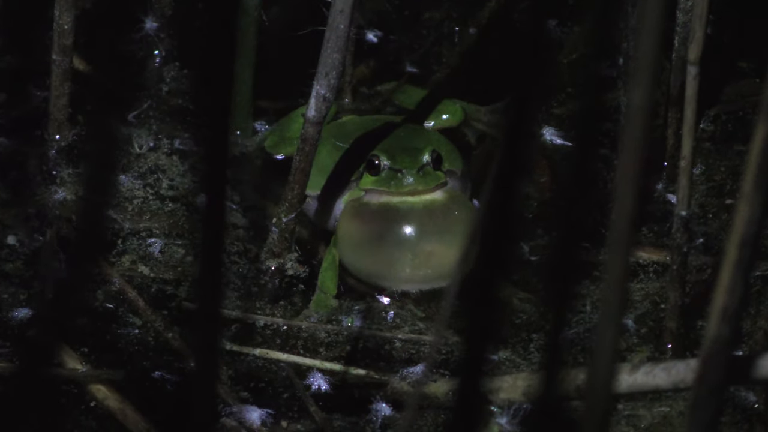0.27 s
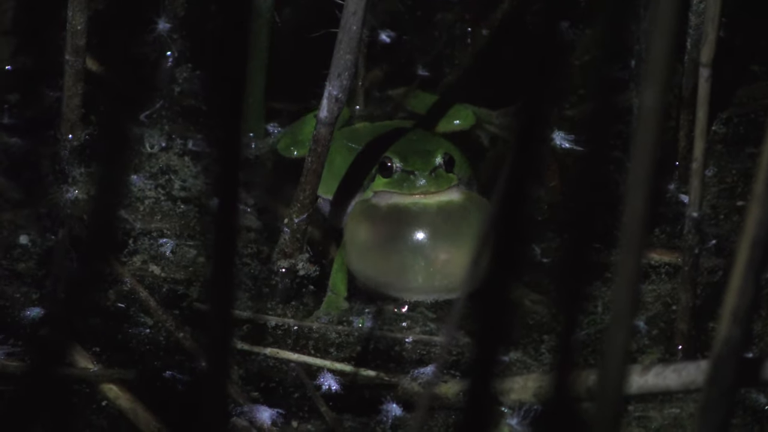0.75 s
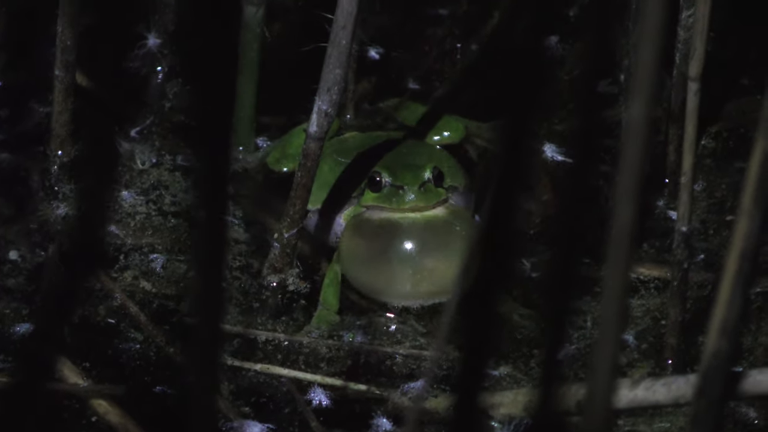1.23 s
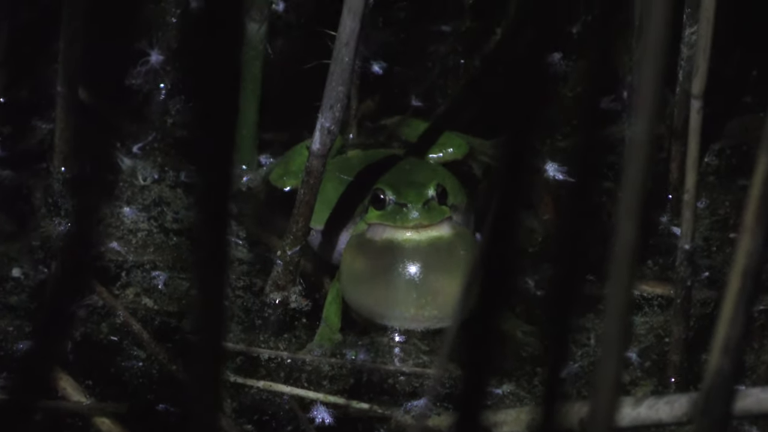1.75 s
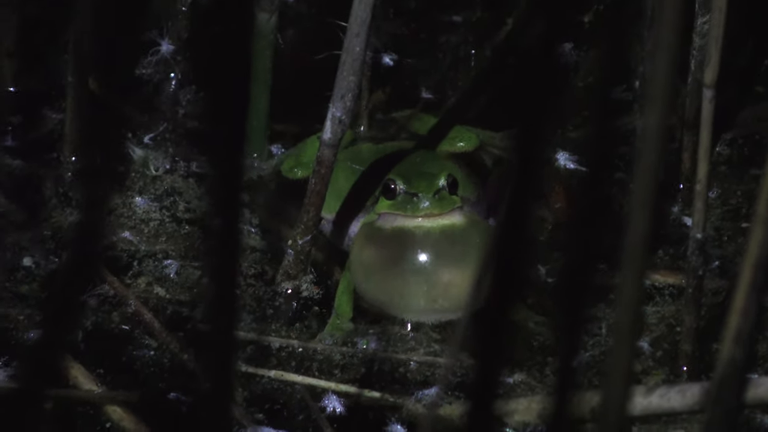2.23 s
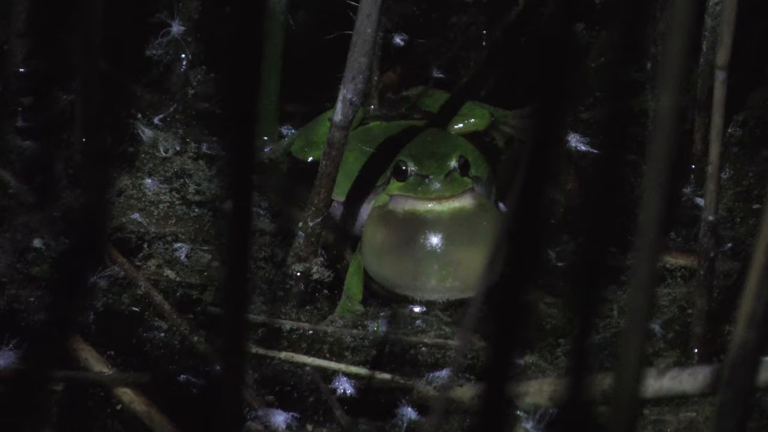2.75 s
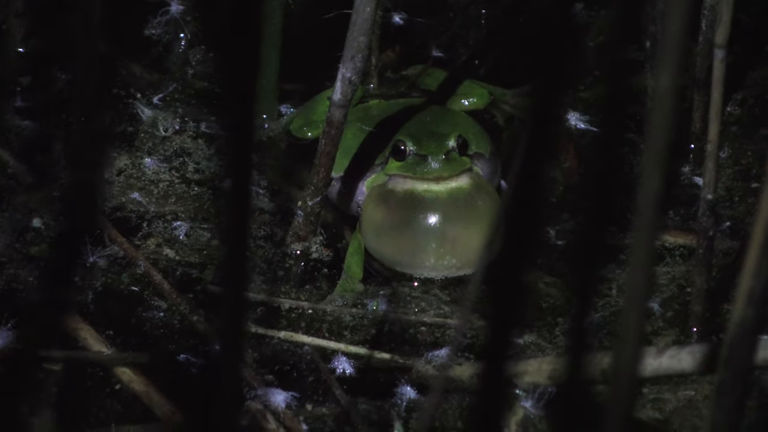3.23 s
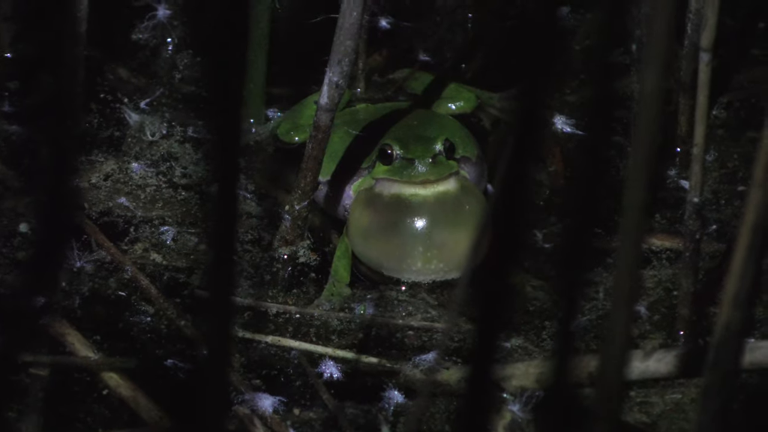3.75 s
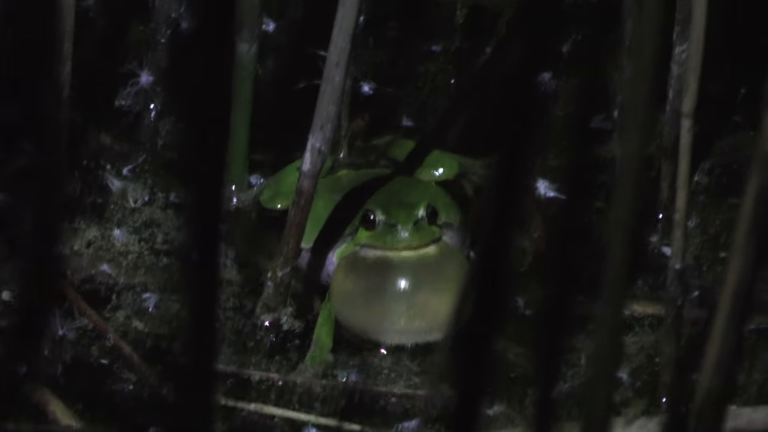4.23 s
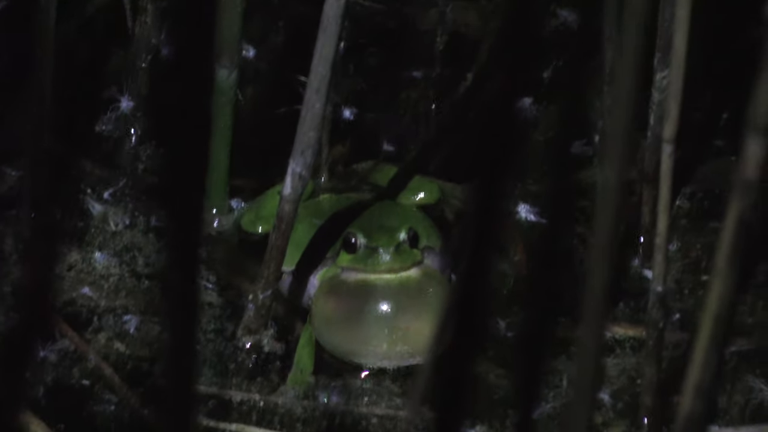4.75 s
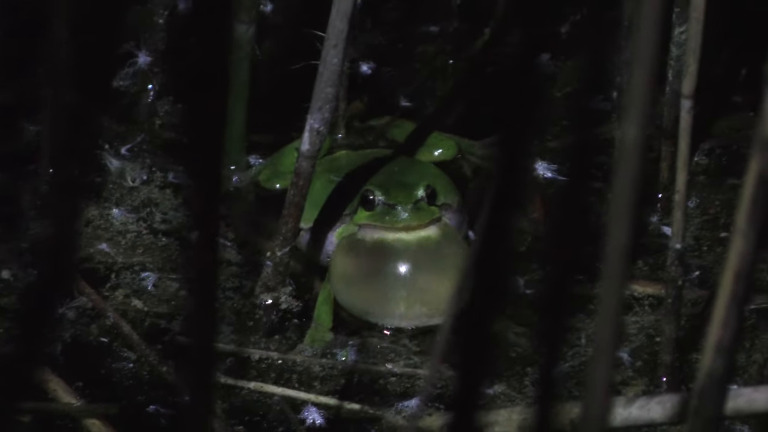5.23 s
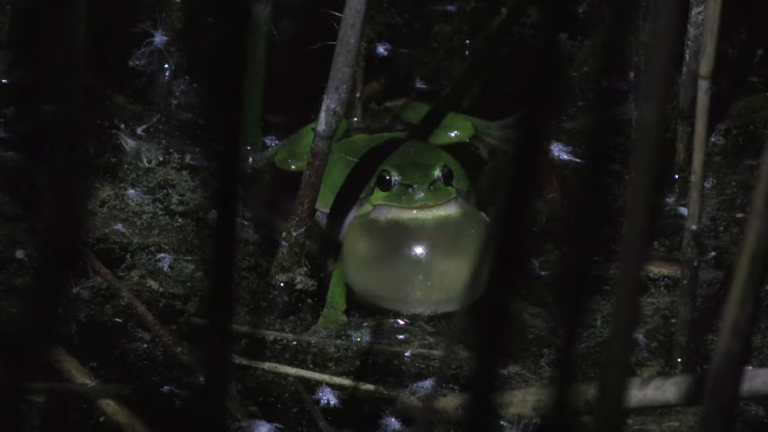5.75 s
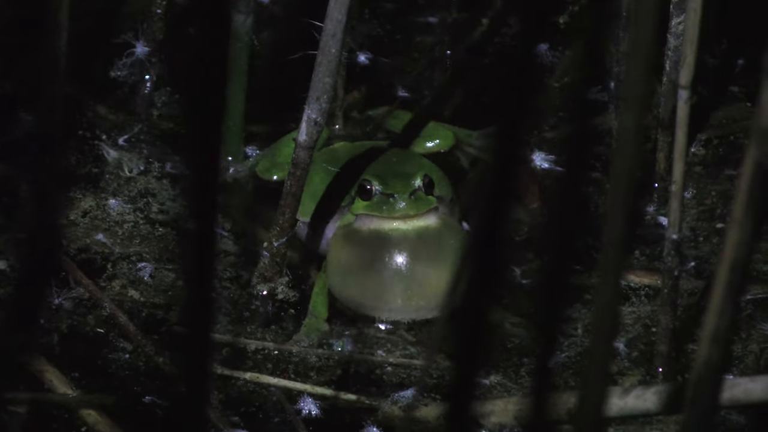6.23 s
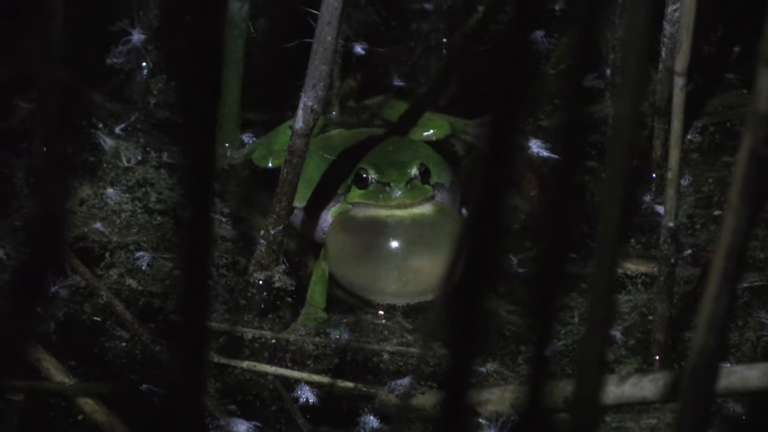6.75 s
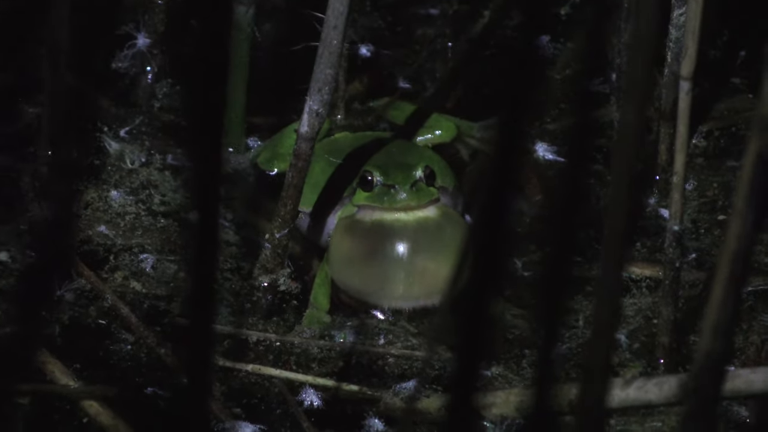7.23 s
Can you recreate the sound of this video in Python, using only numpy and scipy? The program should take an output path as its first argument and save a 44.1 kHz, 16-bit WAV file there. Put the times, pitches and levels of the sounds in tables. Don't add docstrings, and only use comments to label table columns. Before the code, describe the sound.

A night marsh, heard close up and mostly from the left. From the start a nearby tree frog calls about seven times a second, each call a short nasal, raspy croak made of some seven quick pulses, rising slightly in pitch, centred around 2 kHz. From 1.1 s a slightly lower, softer rival joins, interleaving as the first slows to about five a second. At 2.8 s the first frog stops; the rival continues alone in front until 3.9 s, when the first resumes, slower and overlapping with it. The rival ends near 5.7 s, and the first settles into a steady fast train to the end at 7.5 s. Neighbouring frogs answer irregularly, a shriller one from 5.8 s, over a far chorus with tiny lulls. Barely audible stem ticks, low hum and hiss lie below; a very faint distant motor tone creeps in after 6.8 s. Slight short scatter from reeds.

```python
import sys
import numpy as np
from scipy import signal
from scipy.fft import rfft, irfft
from scipy.io import wavfile

SR = 44100
rng = np.random.default_rng(int(sys.argv[2]) if len(sys.argv) > 2 else 0)


def master(y):
    cut = np.clip(np.atleast_2d(y).T, -1, 1)
    pcm = np.round(cut * 32767)
    wavfile.write(sys.argv[1], SR, pcm.astype(np.int16))


def invert_db(x):
    u = np.asarray(x, float) / 20
    return 10 ** u


N = 329848
MIC_LEFT_DB = 10.5
PITCH_RISE_MID = .6


def near_frogs():
    # gap_ms, sac_hz, pan_db, first_pulse_softness_db
    near_voice = (7.55, 2151.7, 10.8, 9.9)
    rival_voice = (6.6, 2038, 10.3, 5.9)
    # start_s, peak_db, pulses
    bout_1 = [(0.0451, -20.5, 8.8), (0.1826, -15, 6.9), (0.3213, -14.5, 6.4), (0.459, -14.5, 6.65),
              (0.5989, -15, 7.04), (0.7293, -17, 8.3), (0.8725, -18.5, 7.1), (1.0067, -16, 8.35),
              (1.1374, -16.9, 9.4), (1.3023, -15, 6.8), (1.4365, -16, 7), (1.6096, -15.5, 6.7),
              (1.7849, -17.5, 8.86), (1.989, -18.5, 8.8), (2.2047, -13.5, 5.04), (2.3923, -16, 7.4),
              (2.5848, -15, 6.55), (2.7872, -15.5, 6.1)]
    bout_2 = [(3.8941, -15, 7.56), (4.1316, -14, 6.7), (4.391, -18.5, 11), (4.6507, -15, 7.7),
              (4.9248, -15.5, 6.7), (5.1119, -14.5, 6.05), (5.299, -15, 7.6), (5.4317, -16.5, 6.2),
              (5.5748, -16.5, 7.07), (5.7544, -13.5, 6.74), (5.9535, -16.5, 9.2), (6.1126, -15.5, 7.04),
              (6.2598, -15, 6.86), (6.4024, -15, 7.3), (6.5521, -15, 6.7), (6.6958, -16, 7.1),
              (6.8429, -15, 6.25), (6.9861, -16, 6.7), (7.1263, -15, 6.24), (7.2725, -15, 6.7),
              (7.4112, -15, 6.7)]
    rival = [(1.119, -14.5, 2.6), (1.1733, -19.5, 5), (1.4083, -18, 4.5), (1.4592, -22.5, 6.4),
             (1.6966, -21, 8.95), (1.8912, -20, 8.7), (2.0783, -21, 9.53), (2.2853, -20, 9.6),
             (2.4714, -19.5, 9.44), (2.6789, -21, 9.2), (2.8715, -20.5, 9.8), (3.1369, -22, 7),
             (3.3329, -19.0, 7.7), (3.5235, -19.5, 8.3), (3.6592, -20.5, 7.47), (3.7879, -18, 6.7),
             (4.0229, -26, 5), (4.0298, -21, 9.5), (4.1615, -20.5, 9.7), (4.2952, -19.5, 7.8),
             (4.397, -20.5, 10.9), (4.5676, -19, 5.7), (4.6494, -22, 32), (4.821, -21, 4.7),
             (4.831, -22.5, 16), (4.9597, -18, 6.5), (5.2122, -23.5, 6.6), (5.2905, -19, 5.2),
             (5.4481, -16.5, 9.9), (5.6477, -20.5, 9.7)]
    return frogs(sung(list(bout_1) + list(bout_2), near_voice) + sung(rival, rival_voice))


def neighbours():
    # gap_ms, sac_hz, pan_db, first_pulse_softness_db
    low_voice = (7.3, 2000, 8, 2.7)
    middle_voice = (7.4, 2070, 8, 2.7)
    high_voice = (6, 2170, 14, 2.7)
    shrill_voice = (7.9, 2280, 8, 20)
    # start_s, peak_db, pulses
    low = [(-0.0414, -34.5, 17), (0.2424, -29, 27), (0.3417, -33, 9.1), (0.5976, -26.5, 9.8),
           (1.3644, -31, 25), (1.518, -29.5, 8.5), (1.6707, -28.5, 17), (1.9216, -24.5, 5.4),
           (2.6345, -30.5, 4.9), (2.87, -24.5, 7.8), (3.1074, -28.5, 13), (3.2147, -29, 9.5),
           (3.29, -31.9, 5), (3.3943, -26, 8), (3.4102, -35, 2.2), (3.6387, -26, 9.8), (3.9525, -26, 4.6),
           (4.0613, -37.5, 7.5), (5.3199, -26, 9.56), (5.8682, -27.5, 10.3), (6.0637, -26, 6.7),
           (7.0235, -30.5, 10.7), (7.3378, -36.5, 7.6)]
    middle = [(0.7837, -27.5, 3.6), (1.0496, -32, 12), (1.2257, -31, 6.2), (2.0005, -25, 7.7),
              (2.2045, -24, 9.7), (2.4489, -39, 3.5), (2.7288, -24, 5.2), (2.7752, -20, 5.3),
              (3.0381, -28, 18), (3.4761, -27, 4.2), (3.6018, -31.5, 5.5), (3.7729, -30, 13),
              (4.2149, -27.5, 6.7), (4.4973, -26.5, 13), (4.5631, -31.5, 17), (4.7407, -27.5, 32),
              (5.0705, -23.5, 30), (5.1787, -36.5, 16), (5.5708, -23, 9.7), (6.4643, -28, 10.7),
              (6.622, -30.5, 7.8), (6.7621, -28.8, 7.7), (6.8829, -29, 9.9), (7.2011, -31.5, 8.7)]
    high = [(0.0459, -17.5, 6.3), (0.0913, -34, 15), (0.7244, -28.5, 33), (0.8556, -22, 24),
            (0.9264, -32.5, 7.7), (0.9813, -29.5, 5.6), (2.0942, -29.5, 10.8), (2.9952, -36, 10),
            (3.1513, -27.5, 21), (4.3491, -28.5, 4.6), (4.8729, -33, 16), (5.0086, -27.5, 7.5),
            (5.1278, -20.5, 7.7)]
    shrill = [(5.7994, -28.5, 8.45), (5.9929, -27.5, 13), (6.1515, -26, 9.7), (6.338, -26.5, 7.6),
              (6.494, -30.5, 7.2), (6.622, -29, 8.7), (6.7621, -29.5, 6.9), (6.89, -36.5, 6.9),
              (7.0106, -16, 3.4), (7.142, -24, 5.15), (7.274, -28.5, 7), (7.405, -26, 6.2)]
    calls = sung(low, low_voice) + sung(middle, middle_voice)
    calls += sung(high, high_voice) + sung(shrill, shrill_voice)
    return frogs(calls)


def sung(calls, voice):
    gap_ms, pitch_hz, pan_db, soft_db = voice
    return [(s, peak_db, gap_ms, pulses, pitch_hz, pan_db, soft_db) for s, peak_db, pulses in calls]


def frogs(calls):
    call_pitch_spread, beat_rise, slap_jitter, slap_spread_db = .011, .05, .02, .6
    breath_fade_db = 1
    start_s, peak_db, gap_ms, pulses, pitch_hz, pan_db, soft_db = np.array(calls).T[:, :, None]
    k = np.arange(11)
    chance = rng.standard_normal((len(calls), len(k), 36))
    gaps_ms = gap_ms * (1 + .3 * .4 ** k)
    at_s = start_s + (np.cumsum(gaps_ms, axis=1) - gaps_ms) / 1000 + 0.00013 * chance[..., 0]
    pitch_hz = pitch_hz * (1 + call_pitch_spread * chance[:, :1, 2])
    fade_db = breath_fade_db * 0.5 ** np.clip(pulses - k - 1, 0, 11)
    pulse_db = peak_db - 4.0 - soft_db * 0.36 ** k - fade_db + 0.5 * chance[..., 1]
    gain = invert_db(pulse_db) * np.clip(pulses - k, 0, 1)
    on = (gain > 0) & (at_s > -.03) & (at_s * SR < N)

    def spread(v):
        return np.broadcast_to(v, at_s.shape)[on]

    through, pitch_hz, chance = spread(1 - 0.56 ** k), spread(pitch_hz), chance[on]
    beat_s = (2 / (pitch_hz * (1 + beat_rise * (through - PITCH_RISE_MID))))[:, None]
    slap_s = beat_s * (np.arange(6) + slap_jitter * (1 + chance[:, 24:30]).clip(0, 3))
    strength = gain[on][:, None] * invert_db(slap_spread_db * chance[:, 6:12])
    pulse = sac_ring(pitch_hz, through, slap_s, strength, chance)
    throat = throat_ring(pitch_hz, through, slap_s, beat_s, strength, chance)
    pulse[:, :throat.shape[1]] += throat
    where = (at_s[on] * SR).astype(int)[:, None] + np.arange(pulse.shape[1]) + SR
    out = []
    for side in sides(spread(pan_db)):
        placed = np.bincount(where.ravel(), (pulse * side[:, None]).ravel(), N + 2 * SR)
        out.append(placed[SR:SR + N])
    return signal.sosfilt(signal.butter(6, 760.0, "high", fs=SR, output="sos"), out)


def sac_ring(pitch_hz, through, slap_s, strength, chance):
    # sac_pitch_multiple, rise_share, level_db, t60_s
    sac_modes = [(.425, 0.032, -10, 0.038), (.56, 0.064, -7.5, 0.013), (1.0, 0.072, 5.5, 0.0092)]
    slap_gains = [0.32, 0.81, 1.18, 0.59, 0.43, 0.31]
    ring = struck(sac_modes, pitch_hz, through, slap_s, strength * slap_gains, chance[:, 12:], length_s=.015)
    return signal.sosfilt(signal.butter(3, 2700.0, fs=SR, output="sos"), ring)


def throat_ring(pitch_hz, through, slap_s, beat_s, strength, chance):
    snap_jitter, dull_start_db = .07, 5.5
    # sac_pitch_multiple, rise_share, level_db, t60_s
    throat_modes = [(1.3, 0.044, -22.5, 0.0054), (1.85, 0.047, -25.5, 0.0061), (2.5, 0.055, -24, 0.0047),
                    (3.15, 0.12, -24.5, 0.0046), (4.05, 0.018, -46.5, 0.017), (4.8, 0.051, -60, 0.009),
                    (6.0, .05, -68.5, 0.0043)]
    overtone = [(1.57, 0.067, -19.5, 0.0048)]
    snap_gains = [1.14, 1.02, 0.55, 0.45, 0.52, 0.11]
    snap_s = slap_s + beat_s * snap_jitter * (2 + chance[:, 30:]).clip(0, 4)
    strength = strength * invert_db(-dull_start_db * (1 - through))[:, None] * snap_gains
    ring = struck(throat_modes, pitch_hz, through, snap_s, strength, 6.0 * chance[:, 15:], length_s=.009)
    ring += struck(overtone, pitch_hz, through, .955 * slap_s, strength, chance[:, 22:], length_s=.009)
    return signal.sosfilt(signal.butter(2, 9000.0, fs=SR, output="sos"), ring)


def struck(modes, pitch_hz, through, slap_s, strength, chance, length_s):
    pitch_wobble = .004
    t = np.arange(round(length_s * SR)) / SR
    slaps_so_far = (t[:, None] >= slap_s[:, None, :]).sum(axis=2)
    out = 0
    for k, (multiple, rise, level_db, t60_s) in enumerate(modes):
        drift = 1 + rise * (through - PITCH_RISE_MID) + pitch_wobble * chance[:, k]
        mode_hz = pitch_hz * multiple * drift
        pole = (2j * np.pi * mode_hz - np.log(1000) / t60_s)[:, None]
        charge = np.cumsum(np.c_[0 * mode_hz, strength * np.exp(-pole * slap_s)], axis=1)
        ring = (np.take_along_axis(charge, slaps_so_far, axis=1) * np.exp(pole * t)).imag
        out = out + invert_db(level_db) * (-1) ** k * ring
    return out


def sides(pan_db):
    ratio = invert_db(pan_db)
    return np.array([2 * ratio, 2 + 0 * ratio]) / (1 + ratio)


def far_chorus(count):
    far_db = -46
    u = rng.random((count, 6))
    start_s, peak_db = u[:, 0] * N / SR - .05, far_db + 6.0 * u[:, 1]
    gap_ms, pulses = 6.8 + 1.8 * u[:, 2], 6.5 + 3.0 * u[:, 3]
    pitch_hz, pan_db = 1960.0 + 220.0 * u[:, 4], 5.5 + 5.0 * u[:, 5]
    soft_db = np.full(count, 7.3)
    return frogs(np.c_[start_s, peak_db, gap_ms, pulses, pitch_hz, pan_db, soft_db]) * lulls()


def lulls():
    width_s, depth = .022, .9
    lull_times = [.435, 0.548, .705, 1.286, 2.179, 2.565, 2.86, 2.979, 3.465, 3.61, 3.745, 3.874, 4.005,
                  5.274, 5.415, 5.56, 5.729, 5.87, 6.255]
    t = np.arange(0, N / SR, .002)
    away_s = np.abs(t[:, None] - lull_times).min(axis=1)
    return np.interp(np.arange(N) / SR, t, 1 - depth * np.exp(-(away_s / width_s) ** 4))


def reeds(x):
    t60_s = 0.14
    t = np.arange(SR // 4) / SR
    common, own = rng.standard_normal((2, len(t)))
    tail = (common + 0.33 * own * [[1], [-1]]) * invert_db(-60 * t / t60_s) * (t > .004)
    tail = signal.lfilter([1], [1, -.55], tail)
    return signal.fftconvolve(x, tail / np.sqrt(np.sum(tail ** 2) / 2), axes=1)[:, :N]


def ticks():
    # at_s, level_db
    snaps = [
        (2.838, -60),
        (3.702, -61),
        (3.288, -68),
        (7.31, -66),
    ]
    t = np.arange(N) / SR
    shape = sum(invert_db(level_db) * np.exp(-((t - s) / .003) ** 2) for s, level_db in snaps)
    bright = signal.butter(4, 8000.0, "high", fs=SR, output="sos")
    return shape * signal.sosfilt(bright, rng.standard_normal((2, N)))


def night():
    hiss_db = -68
    # at_s, level_db
    hum_level = [
        (0.0, -66.5),
        (6.3, -65.5),
        (7.0, -62.5),
        (7.48, -64.5),
    ]
    # freq_hz, level_db_per_hz
    hum_colour = [(18, -21), (30, -5.5), (86, -5.5), (134, -1.5), (195, -7.5), (242, -4), (297, -11.5),
                  (346, -2.5), (471, -3), (640, -3.5), (830, -29.5), (1410, -120)]
    hiss_colour = [(200, -44.5), (500, -19), (1500, -13), (4000, -20.5), (8000, -23.5), (12000, -46.5)]
    s, hum_db = np.transpose(hum_level)
    hum = invert_db(np.interp(np.arange(N) / SR, s, hum_db)) * coloured_noise(hum_colour, alike=0.9)
    return hum + invert_db(hiss_db) * coloured_noise(hiss_colour, alike=0.4)


def coloured_noise(spectrum, alike):
    freq_hz, level_db = np.transpose(spectrum)
    bins_hz = np.maximum(np.arange(N // 2 + 1) * SR / N, 1)
    colour = invert_db(np.interp(np.log(bins_hz), np.log(freq_hz), level_db))
    common, own = irfft(rfft(rng.standard_normal((2, N))) * colour, N)
    alike = np.clip(alike, 0, 1)
    both = np.sqrt(1 + alike) * common + np.sqrt(1 - alike) * own * [[1], [-1]]
    return rms_one(both) * sides(MIC_LEFT_DB)[:, None]


def rms_one(x):
    return x / np.sqrt(np.mean(x ** 2) + 1e-20)


def drone():
    level_db, from_s, fade_in_s, waver_hz = -75, 6.75, .25, 6.3
    tones_hz = [240.0, 362.0]
    t = np.arange(N) / SR
    tones = 0
    for hz in tones_hz:
        waver = 2 * np.sin(2 * np.pi * waver_hz * t + hz)
        tones = tones + np.sin(2 * np.pi * hz * t + waver)
    fade = np.clip((t - from_s) / fade_in_s, 0, 1)
    return invert_db(level_db) * fade * tones * sides(MIC_LEFT_DB)[:, None]


def scene():
    near_reeds_db, neighbour_reeds_db, far_scatter, far_gain = -18, -9.5, 1.3, 4.5
    near = near_frogs()
    around = neighbours()
    chorus = far_chorus(count=70)
    scattered = reeds(invert_db(near_reeds_db) * near + invert_db(neighbour_reeds_db) * around + far_scatter * chorus)
    return near + around + far_gain * chorus + scattered + ticks() + night() + drone()


def top_cut(x):
    return signal.sosfilt(signal.butter(12, 13900, fs=SR, output="sos"), x)


def record(dry):
    return top_cut(dry)


dry = scene()
out = record(dry)
master(out)
```